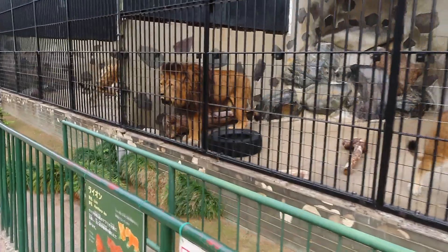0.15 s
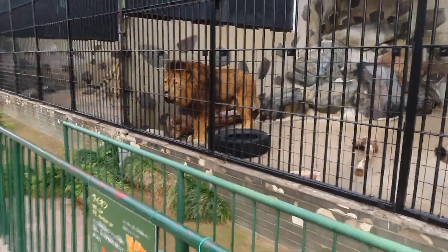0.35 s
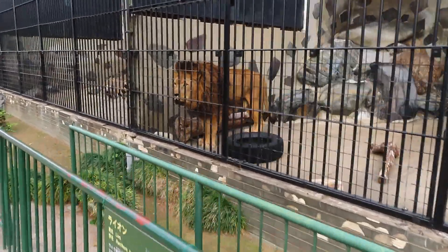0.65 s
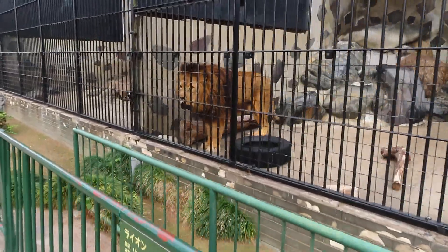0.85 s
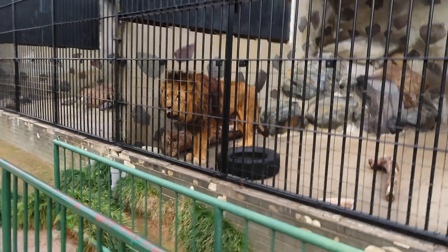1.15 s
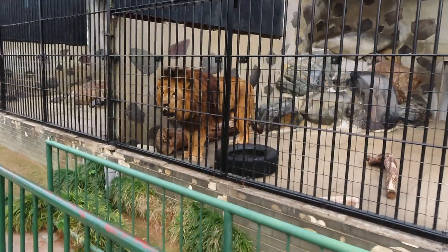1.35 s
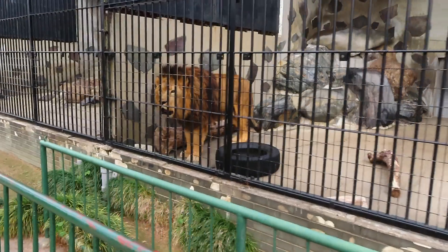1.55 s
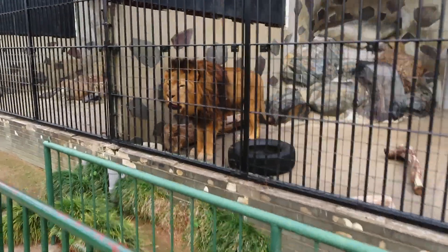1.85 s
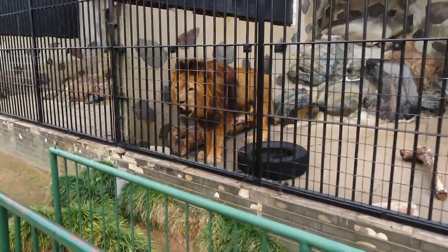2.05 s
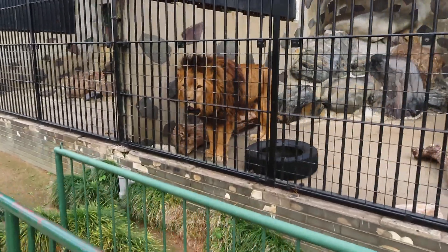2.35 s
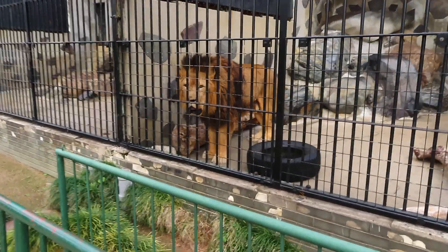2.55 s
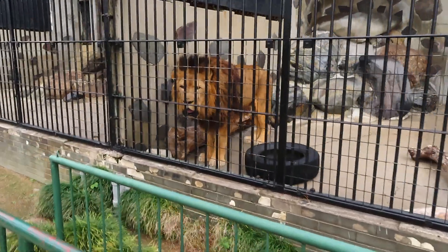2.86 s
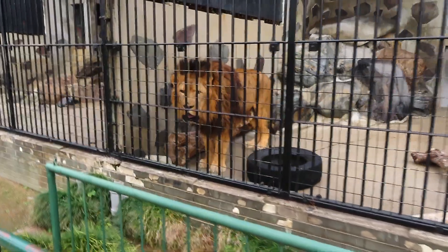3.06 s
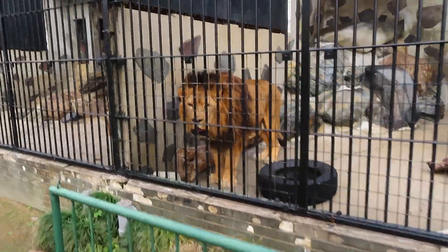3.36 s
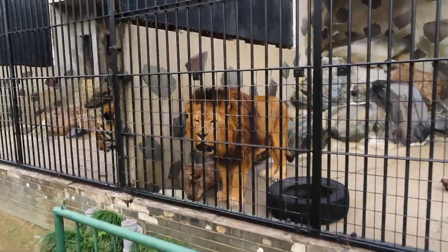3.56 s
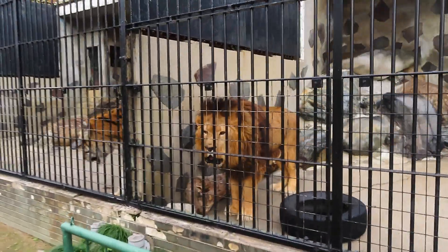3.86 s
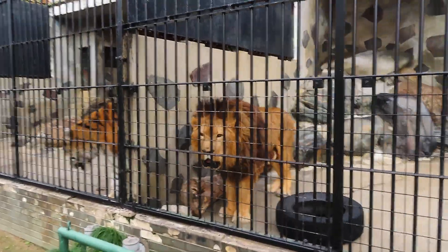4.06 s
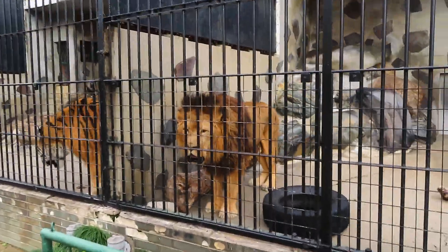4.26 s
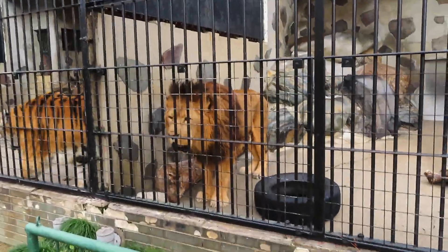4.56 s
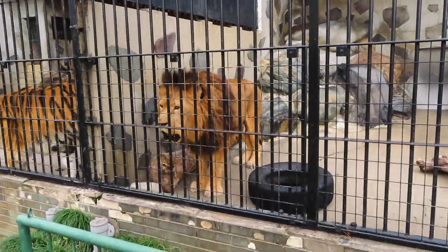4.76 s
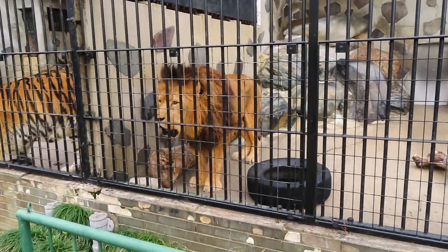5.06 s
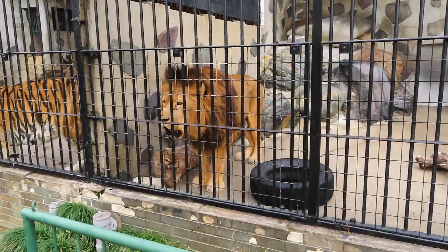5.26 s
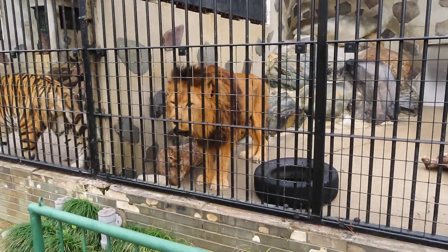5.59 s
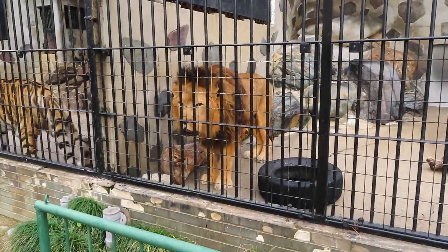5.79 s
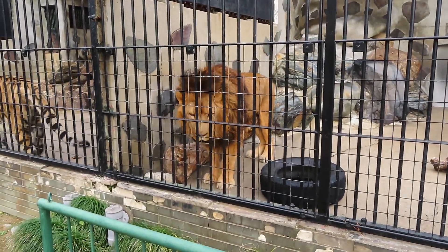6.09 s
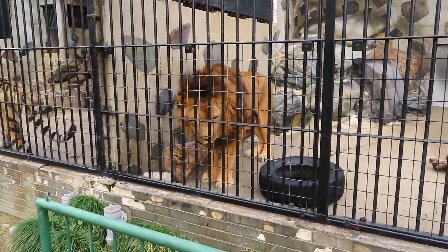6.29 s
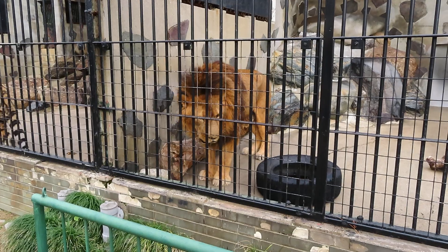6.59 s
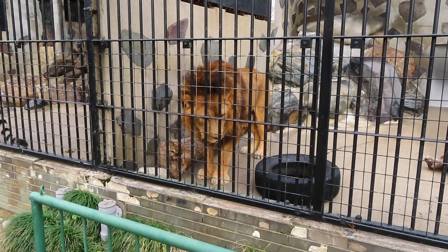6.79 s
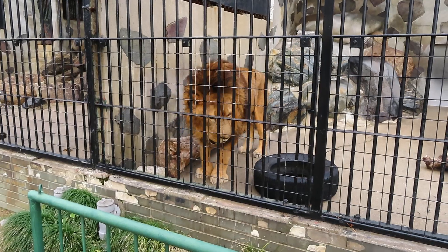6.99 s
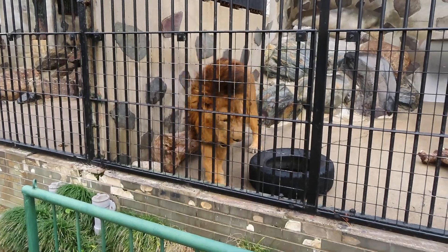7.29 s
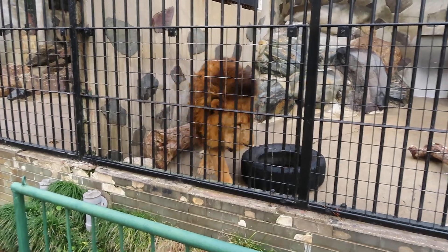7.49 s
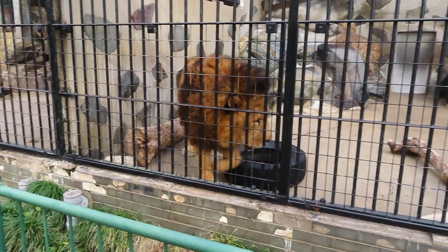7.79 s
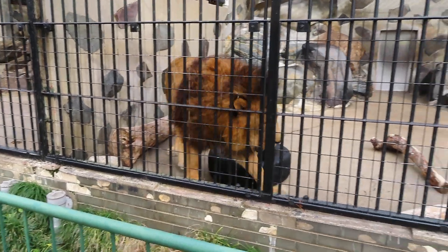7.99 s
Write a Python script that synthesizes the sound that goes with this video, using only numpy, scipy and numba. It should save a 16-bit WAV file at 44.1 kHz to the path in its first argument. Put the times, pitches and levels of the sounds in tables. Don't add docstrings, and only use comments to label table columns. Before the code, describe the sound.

At the start the dull tail of a lion's roar dies away within 0.3 s over low, distant traffic rumble. A short hoarse grunt follows at 0.4 to 0.8 s, deep and throbbing with a falling pitch. Small scuffs and ticks come around 1.0 to 1.2 s. A louder grunting roar erupts at 1.8 s, rising then falling until about 2.3 s. Scuffs and hollow knocks cluster near the microphone at 3.0 to 3.25 s, then a harder, raspier roar hits at 3.6 s and fades by 4.2 s. One bump lands at 4.4 s. Traffic rumble and hiss swell from about 5 s, with faint ticks and thin far squeaks. The last and longest roar runs from 5.8 to 6.4 s, a squeak near 6.1 s. Concrete walls echo briefly; afterwards only traffic and faint squeaks remain until 8 s.

```python
import sys
import numpy as np
from scipy import signal
from scipy.fft import rfft, irfft, next_fast_len
from scipy.io import wavfile
from scipy.ndimage import uniform_filter1d, minimum_filter1d
from numba import njit

SR = 44100
rng = np.random.default_rng(int(sys.argv[2]) if len(sys.argv) > 2 else 0)


def to_wav(sig):
    pcm = np.clip(np.atleast_2d(sig), -1, 1) * 32767
    pcm = np.round(pcm).astype(np.int16)
    wavfile.write(sys.argv[1], SR, pcm.T)


def how_loud(loudness_db):
    steps = np.asarray(loudness_db, float) / 20
    return 10 ** steps


N = 358841
NARROW_UNTIL_S = 3.0


def rms_one(x):
    return x / np.sqrt(np.mean(x ** 2) + 1e-20)


def filt(x, hz, kind, order=2):
    return signal.sosfilt(signal.butter(order, hz, kind, fs=SR, output="sos"), x)


def both_ways(x, hz, kind):
    return signal.sosfiltfilt(signal.butter(3, hz, kind, fs=SR, output="sos"), x)


def at_hz(points, hz):
    points = np.array(points)
    return np.interp(np.log(hz), np.log(points[:, 0]), points[:, 1])


def drift(rate, size):
    knots = rng.standard_normal(size // 200 + 2)
    return np.interp(np.arange(size) * rate / SR, np.arange(len(knots)), knots) * 0.84


def resonate(x, hz, width_hz):
    r = np.exp(-np.pi * width_hz / SR)
    feedback = [1, -2 * r * np.cos(2 * np.pi * hz / SR), r * r]
    return signal.lfilter(np.array([1, 0, -1]) * (1 - r * r) / 2, feedback, x + 1e-18)


@njit
def glide_ring(x, hz, width_hz, spread, rate):
    one, two = np.zeros(len(x)), np.zeros(len(x))
    r, q = np.exp(-np.pi * width_hz / rate), np.exp(-np.pi * width_hz * spread / rate)
    for i in range(2, len(x)):
        c = 2 * np.cos(2 * np.pi * hz[i] / rate)
        one[i] = (1 - r * r) / 2 * (x[i] - x[i - 2]) + r * c * one[i - 1] - r * r * one[i - 2]
        two[i] = (1 - q * q) / 2 * (one[i] - one[i - 2]) + q * c * two[i - 1] - q * q * two[i - 2]
    return two


def slaps(rhythm, end_s):
    # t/s, strength/dB
    hard_slaps = [(.424, -12.5), (.443, -8.5), (.469, -2.5), (0.494, -2), (.517, -3.5), (0.547, -6.5),
                  (0.596, -20), (0.612, -15), (0.661, -11.5), (1.769, -12.5), (1.792, -10.5), (1.802, -4.5),
                  (1.823, -5.5), (1.862, -18), (1.879, -21), (1.932, -4.5), (1.994, 2), (2.032, 1),
                  (2.118, 1), (3.614, -15), (3.639, -7.5), (3.647, -3), (3.682, -9.5), (3.709, 0),
                  (3.771, -4.5), (3.811, -12.5), (3.846, -7), (3.932, -17.5), (5.779, -8.5), (5.802, -1),
                  (5.827, -13.5), (5.854, -5.5), (5.891, 1.5), (5.911, -5.5), (5.933, -3.5), (5.961, -5.5),
                  (5.987, -4.5), (6.022, -6.5), (6.162, -4), (6.192, -10.5), (6.239, -6), (6.267, -3.5),
                  (6.32, -9)]
    first_s, gap_s, growth_s, loss_db_per_s = rhythm
    slap_db, spread_db, jitter_s = -4, -1, 0.0022
    k, chance = np.arange(40), rng.standard_normal((40, 2))
    at_s = first_s + k * gap_s + growth_s * k * k / 2 + jitter_s * chance[:, 0] * (k > 0)
    strength_db = slap_db + spread_db * chance[:, 1] - loss_db_per_s * (at_s - first_s)
    loose = np.transpose([at_s, strength_db])
    hard = np.array(hard_slaps)
    apart = np.abs(at_s[:, None] - hard[:, 0]).min(axis=1) > .013
    both = np.vstack([loose[apart], hard[hard[:, 0] > first_s]])
    return both[both[:, 0] < end_s - .05]


def locked_line(hz, wander):
    return np.sin(2 * np.pi * np.cumsum(hz * (1 + wander * drift(45, len(hz)))) / SR)


def mouth_overtones(turn):
    # multiple, level/dB
    multiples = [(2, 0), (3, -5), (4, -8), (5, -20)]
    return sum(how_loud(db + (k + 1) * drift(18, len(turn))) * np.sin(k * turn) for k, db in multiples)


def throat_rings(slapped, blown, tract, stretch, mouth_gain, since_s):
    part_edges_hz = (260, 640, 1700)
    rasp_wander, rasp_fade_db_per_s_khz = .045, 3.5
    size = len(slapped)
    parts = np.zeros((4, size))
    for k, (hz, width_hz, level_db) in enumerate(tract):
        part = np.searchsorted(part_edges_hz, hz)
        if part < 3:
            follow = .5 if 430 < hz < 640 else 1
            rung = glide_ring(slapped, hz * stretch[part] ** follow, float(width_hz), 4.5, SR)
            if 640 < hz < 800:
                rung = rung * mouth_gain
        else:
            astray = hz * (1 + rasp_wander * drift(14, size))
            flare = how_loud(3.5 * drift(45, size))
            rung = glide_ring(blown, astray, 1.5 * width_hz, 14., SR) * flare
            rung *= how_loud(-rasp_fade_db_per_s_khz * since_s * hz / 1000)
        parts[part] += (-1) ** k * how_loud(level_db) * rung / np.sqrt(width_hz)
    return parts


def roar(curve, rhythm, arc, climb_per_s, overtone_share, tract, voicing, breaths, close_s, sustain):
    per_s, breath, air_db, mouth_db, rasp_db = voicing
    mouth_follows = 1.38
    jaw_loss_db_per_s, jaw_loss_db = 257, 8.5
    buzz = .25
    lock_lost_db = 7
    upper_share, top_air_db = .5, -12.5
    s, effort_db, open_db = np.transpose(curve)
    open_db = np.minimum(open_db, -.3)
    chest_db = 10 * np.log10(1 - how_loud(2 * open_db))
    parts_db = effort_db + np.array([chest_db, open_db, mouth_db + mouth_follows * open_db])
    start, size = round(s[0] * SR), round((s[-1] - s[0]) * SR)
    t = (start + np.arange(size)) / SR
    effort, opening = np.interp(t, s, effort_db), np.interp(t, s, open_db)
    closing = how_loud(-np.clip(jaw_loss_db_per_s * (t - close_s), 0, jaw_loss_db))

    clicks = (rng.random(size) < per_s / SR) * how_loud(-12 + 3 * rng.standard_normal(size))
    for at_s, slap_db in slaps(rhythm, s[-1]):
        clicks[round(at_s * SR) - start] = how_loud(slap_db)
    gust = 0.85 + signal.lfilter([1], [1, -np.exp(-1 / (0.012 * SR))], clicks)
    wind = gust * rng.standard_normal(size)
    slapped = 21 * filt(clicks, 1800, "low", order=1) + breath * wind
    blown = 2.2 * clicks + .28 * wind * gust ** .9

    turns_s, *rings = np.transpose(arc)
    chest, throat, upper, mouth = (np.interp(t, turns_s, hz) for hz in rings)
    climb = 1 + climb_per_s * (t - s[0])
    stretch = [2 * hz / (hz.max() + hz.min()) for hz in (chest, throat, climb)]
    turn = 2 * np.pi * np.cumsum(mouth / 2 * (1 + .008 * drift(60, size))) / SR
    blown = blown * (1 + buzz * np.cos(turn)) ** 2
    parts = throat_rings(slapped, blown, tract, stretch, how_loud(opening / 2) * closing, t - s[0])

    swell = filt(gust, 35, "low") ** .85 * how_loud(np.minimum(0, effort - effort_db.max() + lock_lost_db))
    for part, hz in enumerate((chest, throat)):
        line = rms_one(swell * locked_line(hz, .028 / (1 + 2 * part)))
        parts[part] = rms_one(parts[part]) + sustain * closing ** (.6 * part) * line
    parts[1] += upper_share * rms_one(swell * locked_line(upper, .025) * how_loud(5 * drift(25, size)))
    stack = rms_one(swell * mouth_overtones(turn) * how_loud(opening))
    parts[2] = rms_one(parts[2]) + overtone_share * stack * closing
    air = rms_one(filt(wind, [6200, 8500], "band", order=1))
    top_air = rms_one(filt(wind, [9000, 15000], "band"))
    parts[3] = rms_one(filt(parts[3], 1500, "high")) + how_loud(air_db) * air + how_loud(air_db + top_air_db) * top_air

    levels_db = [np.interp(t, s, db) for db in parts_db] + [rasp_db + np.interp(t, *np.transpose(breaths))]
    fade = np.minimum(1, (s[-1] - t) / .04)
    out = np.zeros(N)
    for part, part_db in zip(parts, levels_db):
        power = uniform_filter1d(uniform_filter1d(part ** 2, size=2000), size=2000)
        out[start:start + size] += part / np.sqrt(power + 1e-12) * how_loud(part_db) * fade
    return out


def lion():
    # t/s, effort/dB, mouth opening as throat against effort/dB
    efforts = [
        [(0.0, -29.5, -16), (0.1, -44, -12), (0.3, -48, -51)],
        [(0.4, -45, -9), (0.445, -26.5, -6.5), (0.476, -18, -2), (0.52, -12.5, -3), (0.62, -10, -6),
         (0.66, -21.5, -8), (0.74, -22, -24), (0.79, -43, -23), (0.86, -46, -16)],
        [(1.75, -54, 8), (1.79, -22.5, -2.5), (1.83, -12.5, -5.5), (1.878, -5, -2), (1.91, -15.5, -4.5),
         (1.96, -12, -3), (2.08, -13, -5.5), (2.24, -30.5, -19), (2.36, -39, -30)],
        [(3.59, -59, -5), (3.61, -30.5, -1), (3.656, -11, -3), (3.7, -10, -1), (3.79, -13, -1.5),
         (3.9, -13, -4), (4.0, -14.5, -10), (4.08, -37, -4), (4.2, -30, -15)],
        [(5.765, -27, 15), (5.79, -19, -5), (5.85, -10, -1.5), (5.9, -11.5, -4), (6.05, -14.5, -1.5),
         (6.15, -15.5, -2), (6.2, -11.5, -7), (6.3, -18.5, -13.5), (6.45, -31, -18)],
    ]
    # first slap t/s, gap/s, gap growth/s per slap, loss/dB per s
    rhythms = [(0.059, 0.22, 0.011, 17), (.42, 0.024, 0.00018, 29), (1.768, .03, 0.0016, 23),
               (3.613, 0.03, 0.0019, 33), (5.778, 0.028, 0, 26)]
    # t/s, chest f/Hz, throat f/Hz, upper throat f/Hz, mouth f/Hz
    arcs = [
        [(0, 124.8, 350, 500, 720), (.3, 117, 334, 500, 726)],
        [(.43, 123.4, 335, 526, 719), (.51, 124.1, 373.5, 535, 735), (.55, 112.6, 338, 508, 762),
         (.62, 111.6, 338, 562.6, 794), (.68, 110.2, 323, 481, 770), (.8, 109.6, 327, 490, 790)],
        [(1.78, 109.3, 330.6, 494, 696), (1.84, 117.5, 345.6, 476, 713), (1.9, 128, 385, 514.4, 746),
         (1.95, 136.2, 380, 469, 712), (2.0, 135.4, 346, 511.5, 755), (2.06, 142.3, 333.5, 477.6, 731),
         (2.1, 128.5, 350, 500, 747), (2.14, 113.6, 348, 426, 735), (2.3, 109.2, 335, 459, 777)],
        [(3.6, 122.7, 350, 495.4, 735), (3.67, 147.7, 370.8, 488.2, 699.4), (3.77, 136.4, 382.5, 500, 741),
         (3.84, 138.4, 372.4, 505.8, 717.4), (3.89, 118, 357.8, 498, 715.5), (3.95, 121.6, 339, 446, 697),
         (4.02, 107.5, 347.3, 458, 727), (4.12, 99, 319.3, 447, 734)],
        [(5.77, 115, 375.5, 488, 697.5), (5.86, 136.5, 362, 500, 727), (5.94, 146.6, 382.7, 492.4, 715),
         (6.02, 138.6, 357.4, 498.3, 707), (6.1, 137.6, 340.1, 491, 706.5), (6.19, 127.7, 324, 505.5, 764),
         (6.28, 112.8, 365.6, 500, 815), (6.45, 114.7, 337, 501.5, 793)],
    ]
    climbs = [-.1, -0.22, 0.036, -0.062, 0.14]
    overtone_shares = [.01, .2, .3, .75, .8]
    # f/Hz, width/Hz, level/dB
    tracts = [
        [(133.6, 28, 0), (350, 42, -21.5), (500, 17, -15), (1090, 500, 16), (1500, 550, 10.5), (3000, 1200, 0)],
        [(108.5, 12, 2), (171.5, 28, -8), (230, 28, -14.5), (353, 9.9, 4), (543, 71, 7), (400, 76, -0.5),
         (727, 40, 6), (934, 39, 10), (1050, 37, 4.5), (1360, 150, 8.5), (1567, 41, -8.5), (1930, 89, 9),
         (2420, 41, -2), (2670, 83, 2.5), (3070, 130, 5.5), (4270, 680, 10), (4800, 110, 5), (5330, 170, -13)],
        [(114.7, 33.5, 4.5), (136, 40.6, 0), (236, 26, -14), (357, 43, 1.5), (485, 61, 2.5), (735, 42, -1.5),
         (927, 99, -2.5), (1257, 66, -3.5), (1270, 630, -8), (1718.7, 64, 1), (2540, 110, -2.5), (2900, 89, 2),
         (3470, 420, 7.5), (4140, 800, 5.5), (5240, 900, 6.5)],
    ]
    # f/Hz, width/Hz, level/dB
    later_tracts = [
        [(108.5, 59, 2.5), (135.6, 50, 3), (203.5, 24, -9), (270, 60, -10.5), (325, 15, 0.5), (384, 27, -2.5),
         (490, 68, -5.5), (574, 80, -15), (714, 37, 5.5), (940, 32, -2), (1027, 37, -1), (1091, 74, -10.5),
         (1336, 163, 0.5), (1500, 21, -16), (1744, 10, 0), (1970, 180, -8), (2800, 110, -1), (3140, 110, -1),
         (3730, 160, 0), (4180, 95, -4), (4990, 200, -2), (6740, 1400, -6)],
        [(96, 39, -0.5), (136, 40.5, -0.5), (196, 32, -5.5), (338, 33.5, 2), (379, 24, -6), (466, 63, -1),
         (746, 26, -2), (952, 41, -11), (1097, 77, -10.5), (1360, 146, -10.5), (1500, 100, -9), (1890, 91, 5),
         (2350, 120, -8), (2690, 79, 0), (3060, 89, -0.5), (3500, 160, 3.5), (4270, 42, -0.5), (4790, 250, -1),
         (5780, 120, -10.5)],
    ]
    voicings = [(30.5, 0.7, -65, -3, -6.5), (24.46, 0.16, -28, -4, 1), (25, 0.32, -15.5, -7.5, 1),
                (25.3, 0.19, -16, -6, -1.5), (25, 0.21, -25.5, -6, -1.5)]
    # t/s, level/dB
    breaths = [
        [(0, -60.5), (.3, -89)],
        [(0.4, -59), (0.404, -61), (0.476, -43), (0.512, -38.5), (0.55, -34), (0.566, -41), (0.626, -40.5),
         (0.824, -68.5), (0.86, -78)],
        [(1.75, -68), (1.79, -46.5), (1.87, -36), (1.95, -37.5), (1.962, -44), (1.994, -37), (2.114, -44),
         (2.13, -51.5), (2.36, -80.5)],
        [(3.59, -65.5), (3.656, -30.5), (3.714, -29), (3.72, -32), (3.856, -36.5), (3.972, -48), (4.026, -45),
         (4.114, -71), (4.2, -63.5)],
        [(5.765, -51.5), (5.857, -29), (5.871, -36.5), (5.901, -33.5), (6.143, -38.5), (6.155, -36),
         (6.229, -47), (6.249, -45), (6.45, -67.5)],
    ]
    jaws_close_s = [.1, .64, 2.07, 3.93, 6.129]
    sustains = [.5, .9, .8, 1.25, 1.25]
    return sum(roar(*one) for one in zip(efforts, rhythms, arcs, climbs, overtone_shares, tracts + later_tracts,
                                         voicings, breaths, jaws_close_s, sustains))


def pen(x):
    pen_t60_s, wall_cut_hz = 0.56, 4600
    size = next_fast_len(N + SR)
    hz = np.arange(size // 2 + 1) * SR / size
    t60 = pen_t60_s / (1 + hz / wall_cut_hz) * np.minimum(1, 0.59 + hz / 1000)
    spectrum, out = rfft(x, size), []
    for lags in rng.uniform(.018, .055, (2, 6)):
        loops = [how_loud(-60 * lag / t60) * np.exp(-2j * np.pi * hz * lag) for lag in lags]
        echoes = sum((-1) ** k * g / (1 - g) for k, g in enumerate(loops))
        out.append(irfft(spectrum * echoes, size)[:N])
    return np.array(out)


def banded_noise(spectrum, patchy_db):
    # f/Hz, correlation
    likeness = [(60, 1), (150, 0.59), (380, -1.1), (950, 0.21), (2380, 0.53), (5980, 0.23), (9000, 0.21),
                (15000, -0.1)]
    lowest, highest = spectrum[0][0], spectrum[-1][0]
    edges = lowest * 2 ** np.arange(0, np.log2(highest / lowest) + .01, 1 / 3)
    out, together, white = 0, drift(3.176, N), rng.standard_normal((2, 2, N))
    for k, (low, high) in enumerate(zip(edges, edges[1:])):
        centre = np.sqrt(low * high)
        mid, side = filt(white[k % 2], [low, high], "band")
        least = np.clip(1 - (high / 600) ** 2, 0, 1)
        alike = np.clip(at_hz(likeness, centre), least, 1)
        gain = how_loud(at_hz(spectrum, centre) + patchy_db * (.4 * together + drift(13, N)))
        out = out + gain * (np.sqrt(1 + alike) * mid + np.sqrt(1 - alike) * side * [[1], [-1]])
    return rms_one(out)


def ambience():
    # f/Hz, level/dB per Hz
    rumble = [(12, -33.5), (20, -13.5), (76, 1), (146, -1.5), (183, -5.5), (248, -9), (352, -8.5),
              (412, -8), (476, -5), (614, -15.5), (767, -22.5), (900, -16), (1170, -51), (1980, -120)]
    hiss = [(410, -21), (700, 4.5), (917, -8), (1200, 2), (1430, -2), (3670, -10), (7000, -20.5),
            (9100, -34), (15400, -120)]
    thin_air = [(3820, -21.5), (6500, -2), (7270, -3.5), (10000, -7), (12500, -10), (15600, -28.5)]
    # t/s, hiss level/dB
    traffic = [(.2, -61.5), (.95, -59.5), (1.3, -57), (1.7, -56.5), (2.45, -58.5), (2.75, -55), (3.0, -57),
               (3.28, -47.5), (3.41, -51), (3.56, -54.5), (4.3, -55), (4.55, -55.5), (4.74, -54),
               (5.25, -48), (5.52, -46), (5.74, -45.5), (6.55, -53), (6.8, -49.5), (7.22, -46),
               (7.6, -50.5), (8.13, -51)]
    # t/s, rumble level/dB
    engine = [
        (.2, -48.5),
        (.95, -47.5),
        (4.74, -43.5),
        (5.25, -40),
        (8.13, -40),
    ]
    t = np.arange(N) / SR
    near_db, engine_db = np.interp(t, *np.transpose(traffic)), np.interp(t, *np.transpose(engine))
    air_db = -72 + 1.27 * (near_db + 53.0) - 1 * (t < NARROW_UNTIL_S)
    return (how_loud(engine_db) * banded_noise(rumble, patchy_db=1.5) + how_loud(near_db) * banded_noise(hiss, patchy_db=3.5)
            + how_loud(air_db) * banded_noise(thin_air, patchy_db=2.5))


def contacts():
    # t/s, peak/dB, centre f/Hz, t60/s
    scuffs = [(0.379, -35, 1450, 0.096), (1, -45, 910, 0.031), (1.055, -43, 875, 0.024),
              (2.503, -42, 984, 0.025), (3.031, -25.5, 1640, 0.065), (3.038, -25.5, 1200, 0.15),
              (3.062, -28.5, 5160, 0.048), (3.052, -22.5, 1700, 0.034), (3.059, -26, 1970, 0.13),
              (3.068, -15.5, 1500, 0.02), (3.082, -18, 1360, 0.0095), (3.104, -29, 1360, 0.018),
              (3.091, -32, 2620, 0.11), (3.118, -39, 2200, 0.08), (3.137, -40, 1200, 0.022),
              (3.187, -18, 1400, 0.034), (3.23, -36, 1760, 0.023), (3.403, -39.5, 1270, 0.037),
              (4.403, -34.5, 1670, 0.11), (4.415, -25.5, 1650, 0.11), (4.459, -41, 972, 0.068),
              (4.84, -44, 1270, 0.032)]
    # t/s, peak/dB, centre f/Hz, t60/s
    ticks = [
        (1.2135, -39, 4300, 0.031),
        (1.2394, -41, 4870, 0.0088),
        (3.178, -30, 4240, 0.017),
        (5.031, -40.5, 4800, 0.014),
        (5.332, -34.5, 3780, 0.015),
    ]
    # t/s, peak/dB, f/Hz, t60/s
    knocks = [(0.995, -30, 237, 0.043), (3.056, -20.5, 355, 0.042), (3.1813, -12, 230, 0.017),
              (3.19, -28.5, 303, .05), (3.203, -24, 323, 0.065), (3.214, -37, 200, 0.024),
              (3.22, -16, 188, 0.028), (3.239, -19.5, 162, 0.031), (4.404, -23, 500, 0.017),
              (4.415, -12.5, 158, 0.019), (4.418, -23, 600, 0.024)]
    out, t = np.zeros(N + SR), np.arange(SR // 5) / SR
    for at_s, peak_db, hz, t60 in scuffs + ticks:
        decay = how_loud(-60 * t / np.clip(t60, .004, .1))
        burst = rng.standard_normal(len(t)) * decay * np.minimum(t / .0008, 1)
        grit = filt(burst, [0.43 * hz, 1.35 * hz], "band", order=3)
        burst = grit + 0.069 * filt(grit, [3500, 6500], "band")
        out[round(at_s * SR):][:len(t)] += how_loud(peak_db) * burst / np.abs(burst).max()
    for at_s, peak_db, hz, t60 in knocks:
        soft = np.minimum(t * hz, 1)
        decay = how_loud(peak_db - 60 * t / max(t60, .01))
        out[round(at_s * SR):][:len(t)] += soft * decay * np.sin(2 * np.pi * hz * t)
    return out[:N]


def squeaks():
    glides = [ (.84, 1.42, 5000, 5050, -68), (1.4, 1.56, 4700, 4000, -72), (7.5, 8.1, 2800, 2800, -69),
              (5.07, 5.8, 4100, 4650, -64), (5.27, 5.44, 3650, 3750, -58), (5.44, 5.6, 3750, 3750, -63),
              (6.6, 6.71, 3550, 3700, -53), (6.68, 6.85, 3620, 3580, -59), (6.69, 6.93, 4000, 3950, -58),
              (6.82, 6.87, 3180, 2950, -58), (6.865, 6.89, 2950, 3150, -58), (6.83, 6.9, 2150, 2020, -56),
              (6.73, 6.8, 2050, 1950, -57), (6.09, 6.19, 3600, 3450, -41), ]
    width = .026
    out = np.zeros(N)
    for start_s, end_s, first_hz, last_hz, level_db in glides:
        start, size = round(start_s * SR), round((end_s - start_s) * SR)
        phase = 2 * np.pi * np.cumsum(np.linspace(first_hz, last_hz, size)) / SR
        a, b = filt(rng.standard_normal((2, SR))[:, :size], width * first_hz, "low")
        tone = rms_one(a * np.cos(phase) + b * np.sin(phase)) * np.hanning(size) ** .35
        out[start:][:size] += how_loud(level_db) * tone[:N - start]
    return out


def ports(mid, echo):
    turn_s = 3.45
    side = how_loud(-17.5) * resonate(mid, 840, 800)
    side = side + how_loud(-6.5) * filt(echo, 1400, "high")
    side = side + how_loud(-20.5) * filt(np.roll(mid, 14), 3000, "high")
    side = side + how_loud(-1.0) * both_ways(np.gradient(mid), 7500, "high")
    side = side - both_ways(side, 330, "low")
    left, right = mid + side * [[1], [-1]]
    early = np.arange(N) < turn_s * SR
    return np.where(early, [np.roll(left, -1), np.roll(right, 1)], [left, right])


def scene():
    roars, close = lion(), contacts()
    left_echo, right_echo = how_loud(-14.5) * pen(roars + how_loud(-2.5) * close)
    mid = roars + close + left_echo + squeaks()
    return ports(mid, right_echo) + ambience()


def band_limit(x):
    return signal.sosfilt(signal.butter(12, 15680, fs=SR, output="sos"), x)


def record(dry):
    room_left = np.minimum(1, 1.0 / (np.abs(dry).max(axis=0) + 1e-9))
    x = dry * uniform_filter1d(minimum_filter1d(room_left, size=301), size=301)
    narrow = signal.sosfilt(signal.cheby2(12, 45, 7850, fs=SR, output="sos"), x)
    loud = uniform_filter1d(np.abs(x[0]), size=2048) > how_loud(-37)
    early = np.arange(N) < NARROW_UNTIL_S * SR
    shut = uniform_filter1d(1. * loud * early, size=1024)
    return band_limit(x + shut * (narrow - x))


dry = scene()
out = record(dry)
to_wav(out)
```